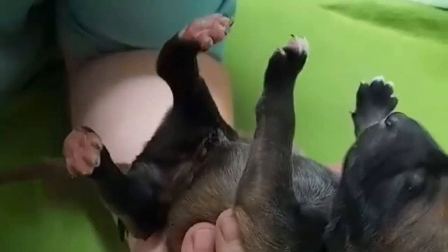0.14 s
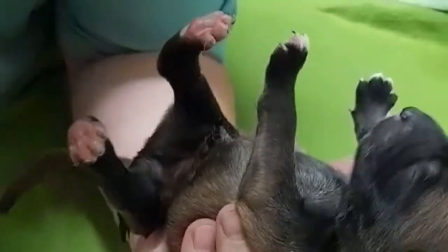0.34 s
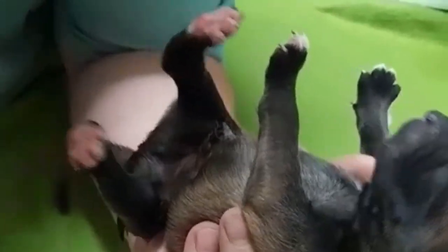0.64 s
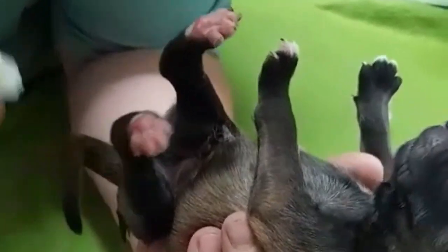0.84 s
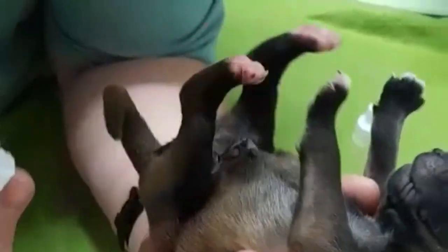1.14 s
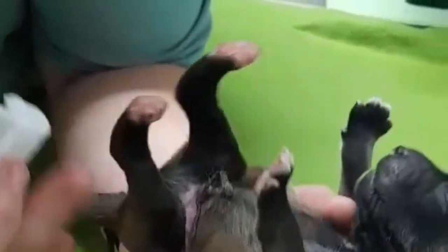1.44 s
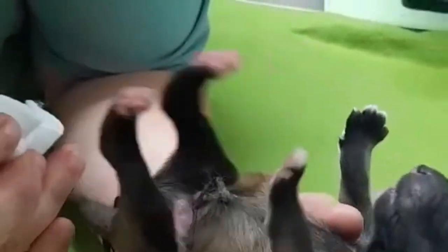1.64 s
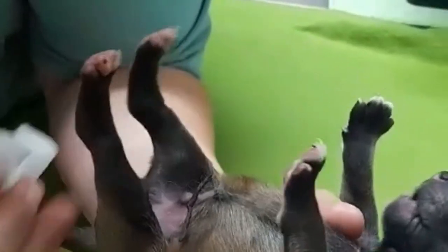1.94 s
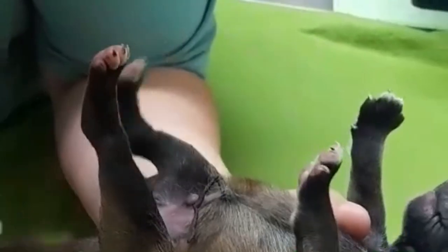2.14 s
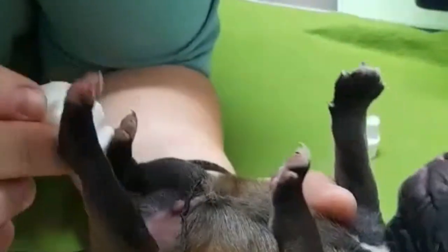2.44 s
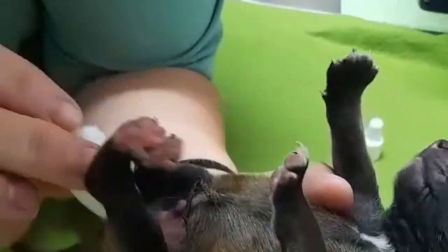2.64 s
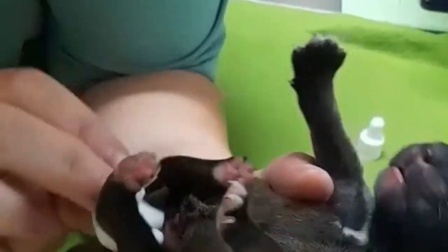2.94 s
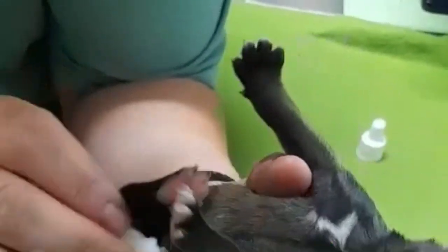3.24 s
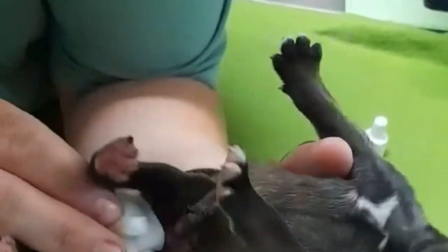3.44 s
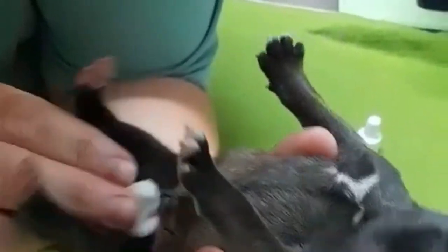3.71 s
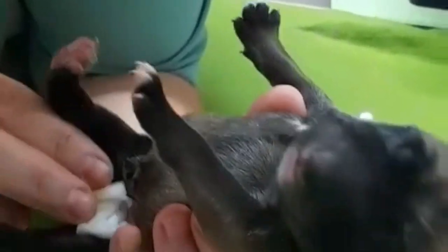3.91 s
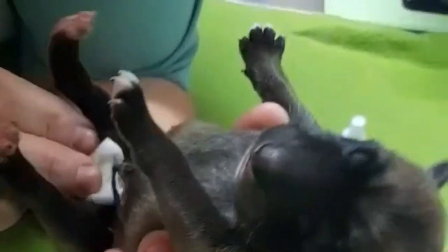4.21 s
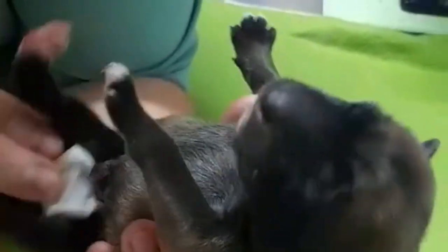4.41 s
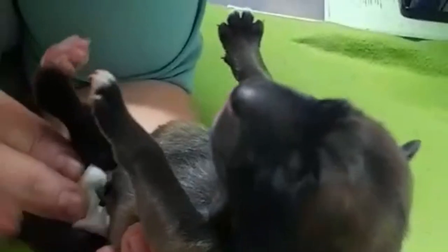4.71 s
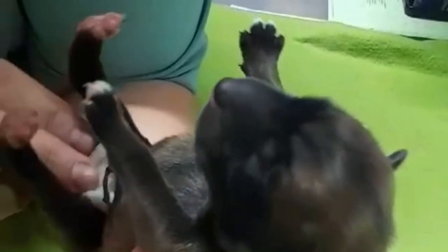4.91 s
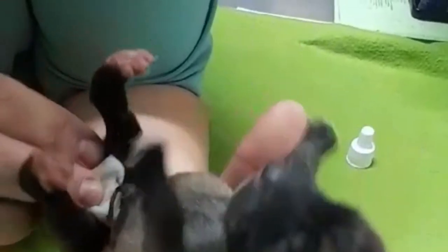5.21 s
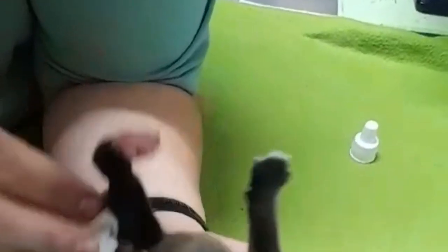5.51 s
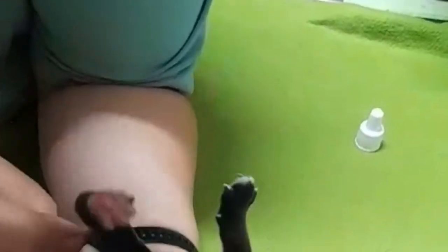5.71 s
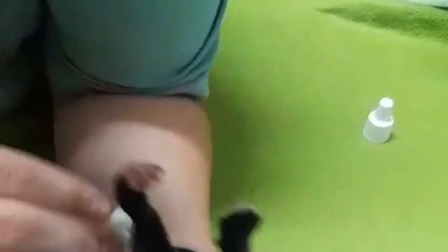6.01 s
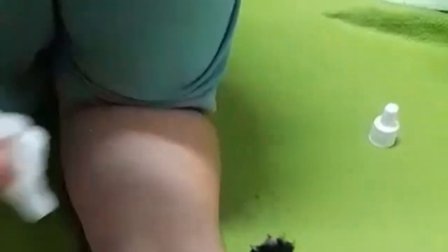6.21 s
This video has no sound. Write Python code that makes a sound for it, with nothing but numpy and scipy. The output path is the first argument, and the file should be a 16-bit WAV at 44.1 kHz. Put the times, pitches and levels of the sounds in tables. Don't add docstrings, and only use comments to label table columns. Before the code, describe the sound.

Close, thin puppy cries whistle, rasp and wail in a small soft room, with tiny nose gasps, fabric rustles and steady low hum.

```python
import sys
import numpy as np
from scipy import signal
from scipy.fft import rfft, irfft
from scipy.io import wavfile
from scipy.ndimage import uniform_filter1d, map_coordinates

SR = 44100
rng = np.random.default_rng(int(sys.argv[2]) if len(sys.argv) > 2 else 0)


def file_out(sig):
    cols = np.atleast_2d(sig).T
    lim = np.clip(cols, -1, 1)
    pcm = np.round(lim * 32767).astype(np.int16)
    wavfile.write(sys.argv[1], SR, pcm)


def rack_gain(trim_db):
    fader = np.asarray(trim_db, float)
    return 10 ** (fader / 20)


N = 280476
TIME = np.arange(N) / SR
FREQ = np.arange(N // 2 + 1) * SR / N

# (time [s], slow fold rhythm [Hz], level
# [dB], mouth gape [dB], left minus right [dB])
YELP = [
    (1.137, 521, -66, 10.5, 0),
    (1.165, 569, -54.5, 0, -4.5),
    (1.177, 510, -55, 5.5, 3),
    (1.197, 558, -57.5, 7, 1),
    (1.21, 578, -46, -4.5, 1),
    (1.25, 575.8, -45.5, 3.5, 0),
    (1.337, 567.7, -46.5, 0.5, -1),
    (1.369, 546.5, -50.5, -0.5, -7),
    (1.388, 539, -56.5, 2, -5),
]
CROAK = [
    (1.858, 515.2, -62, -6, -3.5),
    (1.882, 599, -51.5, -13, -4),
    (1.886, 403, -56.5, -4, -10),
    (1.922, 485.6, -53, -4.5, -3),
    (1.93, 571, -50, -5, 0),
    (1.96, 618.4, -51, -15.5, -2),
    (1.986, 648.4, -55, 3, -4),
]
SHRIEK = [
    (2.02, 667, -59, 11.5, -0.5),
    (2.151, 648.6, -48.5, 4, -1.5),
    (2.165, 604.6, -47, -1, -3),
    (2.193, 629, -48.5, -7, -5.5),
    (2.282, 628.5, -46, -19.5, 3.5),
    (2.317, 644, -49.5, -17, 0.5),
    (2.355, 669, -50.5, -22, 3),
    (2.384, 670, -57, -11, 3),
]
WHEEZE = [
    (2.401, 658, -57, -20.5, 0),
    (2.576, 647.5, -52.5, -19, -1),
    (2.661, 640.6, -54, -16, -2.5),
    (2.691, 592.6, -44, -21.5, -3.5),
    (2.736, 574.5, -47, -15.5, -6),
    (2.775, 542, -47.5, -13.5, -3.5),
    (2.79, 551, -41.5, -16, -1.5),
]
SQUEAL = [
    (2.848, 542, -41.5, -13.5, -5.5),
    (2.908, 561, -38, -16, -7.5),
    (2.982, 645, -38.5, -10.5, 2),
    (3.05, 688.5, -46.5, -6.5, 4.5),
    (3.084, 698.3, -40, -9.5, 11.5),
    (3.195, 647, -36.5, -14, 5.5),
    (3.226, 620, -46.5, -6, -10),
    (3.28, 653, -42.5, -9.5, 3),
    (3.316, 654.4, -49, -6, 4),
]
HOWL_UP = [
    (3.822, 365.3, -58, 1.5, 2),
    (3.87, 386.2, -48.5, -1, 4.5),
    (3.918, 417, -49.5, 3.5, -0.5),
    (3.966, 400.5, -51, 6, 7),
    (4.03, 472.5, -44.5, 3, 4),
    (4.085, 576, -40, 1, 7.5),
    (4.134, 561.2, -39.5, -1, 3.5),
    (4.233, 553.5, -42, 3.5, -4.5),
    (4.275, 583, -43.5, 5.5, 12.5),
]
HOWL_DIP = [
    (4.31, 559.8, -43, 5.2, -1),
    (4.366, 454, -48.5, 9.1, 6.5),
    (4.404, 441.5, -56.5, 16, 8.5),
    (4.44, 445.2, -52, 8, 8),
    (4.512, 514, -50, 8, 5),
    (4.54, 512.5, -48, 8, 3.5),
    (4.6, 536.5, -40.5, 4.7, 2),
    (4.652, 553, -40, 2.8, 4),
]
CRIES = [YELP, CROAK + SHRIEK + WHEEZE + SQUEAL, HOWL_UP + HOWL_DIP]
ATTACK_S, ATTACK_DB = .005, -8

# (time [s], rhythm [Hz], level [dB], hold [s], gape [dB])
BREAKS = [
    (1.396, 413.4, -50, 0.0048, -3),
    (3.322, 565, -39, 0.014, -21.5),
    (4.665, 408.8, -46, .03, 1),
]
BREAK_UNDERSHOOT = [0.99, .86, 0.94]
BREAK_SAG, BREAK_TURN_DB = 1, -0.5
RELEASE_S, RELEASE_DB, RELEASE_GAPE_DB = .03, -34, 17.5

# (time [s], register)
SLIPS = [(0, "creak"), (1.207, "whistle"), (1.365, "gulp"), (1.6, "croak"), (1.886, "slide"),
         (1.928, "croak"), (1.98, "chaos"), (2.11, "split"), (2.177, "pipe"), (2.388, "rasp"),
         (2.68, "pipe"), (2.736, "split"), (2.783, "squeal"), (3.02, "crest"), (3.15, "strain"),
         (3.318, "yip"), (3.6, "hoarse"), (3.87, "howl"), (4.07, "sing"), (4.34, "moan"), (4.455, "grate"),
         (4.515, "moan"), (4.56, "wail"), (4.66, "choke")]
FOLDS = {"creak": (-7, .31), "slide": (-19, .42), "whistle": (-43, .05), "squeal": (-50, .02),
         "chaos": (-12, .88), "rasp": (-14, .78), "hoarse": (0, .4), "howl": (0, .24), "sing": (0, .12),
         "gulp": (-8, .6), "yip": (-27, .3), "croak": (-7, .46), "split": (-7, .42), "pipe": (-45, .045),
         "crest": (-50, .016), "strain": (-50, .02), "moan": (0, .13), "grate": (0, .4), "wail": (0, .14),
         "choke": (-4, .45)}
COLOURS = {"creak": (1.5, -16.5, -5.5, -11, -4), "slide": (-4, -12.5, -5.5, 1, 2),
           "whistle": (-11, -14, -16.5, -6.5, -4), "squeal": (-5.5, -13.5, -8.5, -0.5, 4),
           "chaos": (-4.5, -13, -11.5, 5.5, 4.5), "rasp": (-4.5, -15, -11, 2.5, 12),
           "hoarse": (-7, -11, -5.5, -4, -4), "howl": (-7.5, -10, -9.5, -2.5, -10),
           "sing": (-18, -10.5, -8, -4, -10), "gulp": (-9.5, -12, -15, -3, 1.5),
           "yip": (-21, -23, -9, 5, -2), "croak": (-3.5, -9, -10, -3, 2), "split": (-7, -17, -9.5, 4.5, 8),
           "pipe": (-9.5, -15.5, -10.5, 0, 6.5), "crest": (-13, -9, -10.5, -2.5, 7.5),
           "strain": (-6, -15.5, -1.5, 1, -3), "moan": (-11.5, -10.5, -16.5, -3, -13.5),
           "grate": (-10, -10, -17.5, -1.5, -9), "wail": (-8, -13, -6, -3.5, -1.5),
           "choke": (-11, -13.5, -9, -0.5, 4)}
SECOND_PER_GAPE, TOP_PER_GAPE = 0.23, 0.72

# (frequency [Hz], level [dB])
THROAT = [(240, -24), (450, -2.5), (1200, 11.5), (1800, 9), (3500, -14), (4200, -18.5), (4700, -21.5),
          (5600, -31), (7100, -28), (8400, -41), (9200, -26), (10200, -13), (12300, -24.5), (14500, -6),
          (16000, -38.5)]
BAND_EDGES_HZ = [1850, 3000, 4250, 6100, 8600, 12200]

# (time [s], level [dB])
GASPS = [
    [(1.42, -66), (1.48, -71.5), (1.6, -78), (1.7, -72.5), (1.84, -80.5)],
    [(4.74, -58), (4.85, -77.5), (5.1, -78), (5.16, -86)],
    [(6.2, -81.5), (6.3, -75.5), (6.36, -70)],
]
# (frequency [Hz], width [Hz], level [dB])
NOSE = [(1105, 580, -3.5), (2510, 1600, -3.5), (3110, 190, -12.5), (4330, 690, -13), (13500, 3000, -25.5)]

# (time [s], level [dB], length [s], centre [Hz],
# width [Hz])
RUSTLES = [(0.037, -83, 0.53, 6600, 910), (0.738, -74, 0.055, 13000, 7000),
           (0.746, -79, 0.035, 13500, 5000), (1.695, -74, 0.097, 13500, 2987),
           (5.077, -78, 0.094, 13500, 3000), (5.4155, -60, .003, 2000, 5000),
           (5.952, -75, 0.31, 8940, 9200), (6.037, -70.5, 0.06, 6000, 8050), (0.598, -61.5, 0.11, 200, 200),
           (1.894, -49, 0.1, 100, 79.96), (2.733, -69, 0.073, 100, 79.96), (4.687, -39, 0.04, 419, 295.2),
           (6.049, -54, 0.08, 147, 298), (6.296, -74, 0.0078, 6940, 10000),
           (6.319, -73, 0.046, 13000, 5000), (4.692, -52, 0.09, 12200, 6000),
           (3.316, -64.5, 0.04, 5000, 8954)]

# (frequency [Hz], width [Hz], level [dB], unrelated part [dB])
ROOM_MODES = [(30, 15, -88.5, -4), (53.4, 25, -77, -5), (100, 13, -65.5, -15), (138.3, 56, -63.5, -15.5),
              (198.5, 21, -64.5, -8), (273, 108, -72.5, -5.5), (386, 6.5, -89, -1)]
MOTOR_HZ, MOTOR_DB = 194.3, -59.5
# (frequency [Hz], density [dB per Hz])
HISS = [(300, -12.5), (400, -4.5), (600, -4), (1040, -8.5), (1640, -15.5), (6500, -20), (7600, -25),
        (8600, -30), (9300, -13), (10500, -16.5), (12000, -17.5), (14500, -15), (16000, -23)]
HISS_DB = -78.5

# (frequency [Hz], left minus right [dB])
PORT_BALANCE = [(60, -6.5), (110, -12.5), (200, -9), (380, 5), (700, 3.5), (1290, -6), (2380, -3.5),
                (4400, -4), (8120, 15), (15000, 13.5)]
PORT_LAG = 11.2


def puppy():
    _, first_db, gape_db, pan_db = uniform_filter1d(curve(sum(cries(), [])), size=130)
    second_db, third_db, top_db, fill_db, sheen_db = register(COLOURS)
    second_db = second_db + SECOND_PER_GAPE * gape_db
    third_db = third_db + gape_db
    top_db = top_db + TOP_PER_GAPE * gape_db

    spectrum = rfft(colour(folds(), THROAT))
    below = [0] + [1 / (1 + (FREQ / edge) ** 20) for edge in BAND_EDGES_HZ] + [1]
    bands = [irfft(spectrum * (upper - lower), N) for lower, upper in zip(below, below[1:])]
    even = [b / np.sqrt(uniform_filter1d(b ** 2, size=1100) + 1e-4) for b in bands]

    gain = rack_gain(first_db) * during(cries())
    body = even[0] + rack_gain(second_db) * even[1] + rack_gain(third_db) * even[2]
    body += rack_gain(third_db + 2.1 * fill_db - 13.5) * even[3]
    valley_db = 0.42 * third_db + 0.55 * top_db + fill_db - 11.5
    top = rack_gain(valley_db) * even[4] + rack_gain(top_db - 6.0) * (even[5] + rack_gain(sheen_db) * even[6])
    return gain * body, gain * top, pan_db


def folds():
    hz = uniform_filter1d(curve(sum(cries(), []))[0], size=200)
    half_db, rough = register(FOLDS)
    rough = rough * (1 + .35 * np.tanh(walk(30)))
    shake = .11 * rough ** 1.5 * walk(500)
    shake += .07 * rough ** 3 * np.tanh(walk(150))
    shake += .003 * walk(40)
    phase = 2 * np.pi * np.cumsum(hz * (1 + shake)) / SR

    on = during(cries()) > 0
    lines = np.zeros(N)
    for k in range(1, 42):
        weight = rack_gain(half_db[on]) if k % 2 else 1
        flutter = np.interp(TIME[on] * 30, np.arange(200), rng.standard_normal(200))
        flutter_db = min(.6 * k, 7) * flutter
        audible = k * hz[on] < 16500
        lines[on] += rack_gain(flutter_db) * weight * audible * np.cos(k * phase[on])
    lines *= rack_gain(8 * rough ** 1.4 * np.tanh(walk(900)))

    half = rack_gain(half_db)
    open_share = half * np.cos(phase) + (1 - half) * np.cos(2 * phase)
    air = (1 + .75 * open_share) * rng.standard_normal(N)
    air = colour(air, [(300, -22), (1800, -25), (3500, -12), (5000, -15), (8300, -11), (9300, 3), (16000, 3)])
    return lines + 12 * (.007 + rough + .3 * half) * air


def cries():
    tables = []
    for rows, (s, hz, db, hold, gape_db), dip in zip(CRIES, BREAKS, BREAK_UNDERSHOOT):
        first = np.add(rows[0], (-ATTACK_S, 0, ATTACK_DB, 0, 0))
        gulp = [(s, hz * dip, db + 2, gape_db),
                (s + hold, hz * (1 + .03), db, gape_db),
                (s + hold + RELEASE_S, hz * BREAK_SAG, db + RELEASE_DB, gape_db + RELEASE_GAPE_DB)]
        tables.append([tuple(first)] + rows + [row + (BREAK_TURN_DB,) for row in gulp])
    return tables


def register(traits):
    now = np.searchsorted([s for s, _ in SLIPS], TIME, side="right") - 1
    values = np.array([traits[name] for _, name in SLIPS], float).T
    return uniform_filter1d(values[:, now], size=500)


def gasps():
    air = sum(rack_gain(db) * unit(resonance(rng.standard_normal(N), hz, width)) for hz, width, db in NOSE)
    level_db = curve(sum(GASPS, []))[0] + 2 * walk(30)
    return air * rack_gain(level_db) * during(GASPS)


def rustles():
    out = np.zeros((2, N + SR))
    for s, db, length, hz, width in RUSTLES:
        age = np.arange(SR) / SR / length
        rise = min(8, hz * length / 3)
        grain = rng.standard_normal((2, SR)) * rack_gain(2.5 * walk(300)[:SR])
        shared = grain[0] + .5 * grain
        brush = unit(resonance(shared, hz, width)) * (1 - np.exp(-rise * age)) * np.exp(-2.5 * age)
        start = int(s * SR)
        out[:, start:start + SR] += rack_gain(db) * brush
    return out[:, :N]


def room(x, t60_s, wet_db):
    age = np.arange(int(.4 * SR)) / SR
    decay = np.exp(-np.log(1000) * age / t60_s)
    tail = rng.standard_normal((2, len(age))) * decay * (age > .001)
    tail /= np.sqrt(np.sum(tail ** 2, axis=1, keepdims=True))
    return rack_gain(wet_db) * signal.fftconvolve(x[None], tail, axes=1)[:, :N]


def hum():
    mid = sum(rack_gain(db + 1.0 * walk(5)) * unit(resonance(rng.standard_normal(N), hz, width))
              for hz, width, db, _ in ROOM_MODES)
    motor_phase = 2 * np.pi * np.cumsum(MOTOR_HZ * (1 + .008 * walk(5))) / SR
    mid += rack_gain(MOTOR_DB + 1.8 * walk(6)) * np.sin(motor_phase)
    apart = sum(rack_gain(db + apart_db) * unit(resonance(rng.standard_normal((2, N)), hz, width))
                for hz, width, db, apart_db in ROOM_MODES)
    return np.array([rack_gain(-4.0) * mid, rack_gain(1.5) * late(mid, PORT_LAG)]) + apart


def hiss():
    return np.array([rack_gain(HISS_DB + 0.27 * walk(0.67)) * unit(colour(rng.standard_normal(N), HISS))
                     for _ in range(2)])


def unit(x):
    return x / np.sqrt(np.mean(x ** 2))


def curve(rows):
    s, *columns = np.transpose(rows)
    return [np.interp(TIME, s, c) for c in columns]


def during(tables):
    inside = sum((TIME > t[0][0]) & (TIME < t[-1][0]) for t in tables)
    return uniform_filter1d(1. * inside, size=60)


def colour(x, points):
    hz, db = np.transpose(points)
    grid = np.arange(1025) * SR / 2048 + 1
    cepstrum = irfft(np.log(rack_gain(np.interp(np.log(grid), np.log(hz), db))))
    cepstrum[1:1024] *= 2
    cepstrum[1025:] = 0
    return signal.fftconvolve(x, irfft(np.exp(rfft(cepstrum))))[:N]


def resonance(x, hz, width):
    freq = np.arange(x.shape[-1] // 2 + 1) * SR / x.shape[-1] + 1
    detuning = (freq - hz ** 2 / freq) / width
    return irfft(rfft(x) / (1 + detuning ** 2), x.shape[-1])


def late(x, samples):
    return irfft(rfft(x) * np.exp(-2j * np.pi * FREQ * samples / SR), N)


def walk(rate):
    k = int(SR / rate)
    held = np.repeat(rng.standard_normal(N // k + 1), k)
    return unit(uniform_filter1d(uniform_filter1d(held, k), k)[:N])


def scene():
    body, top, pan_db = puppy()
    body = rack_gain(6.5) * body + gasps()
    left = colour(rack_gain(pan_db / 2 - 3.0) * body + rack_gain(-10.0) * top, PORT_BALANCE)
    place = np.arange(N) - PORT_LAG - 1.3 * walk(3)
    right = rack_gain(-pan_db / 2 - 2.5) * body + rack_gain(-2.5) * top
    right = map_coordinates(right, [place], order=3)
    echoes = room(top, t60_s=.045, wet_db=-3)
    echoes += room(resonance(body, 1200, 4500), t60_s=0.17, wet_db=-13.0)
    voice_db = 10 * np.log10(uniform_filter1d(body ** 2, size=9000) + 1e-9)
    lift_db = 0.38 * np.clip(voice_db + 50.5, 0, None)
    return np.array([left, right]) + echoes + rack_gain(lift_db) * hum() + hiss() + rustles()


def top_cut(x):
    return signal.sosfilt(signal.butter(12, 16420, fs=SR, output="sos"), x)


def record(dry):
    return top_cut(dry)


dry = scene()
out = record(dry)
file_out(out)
```